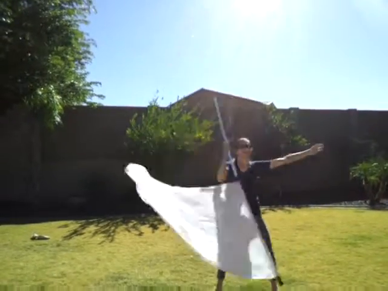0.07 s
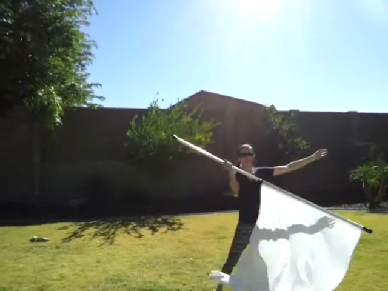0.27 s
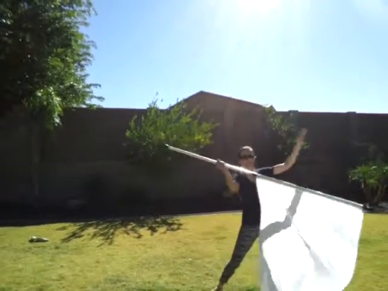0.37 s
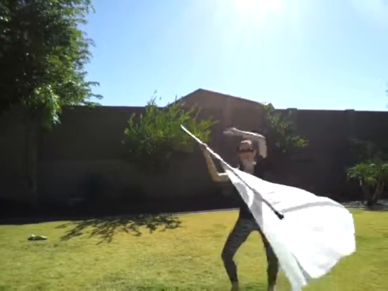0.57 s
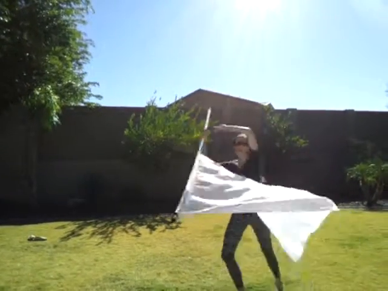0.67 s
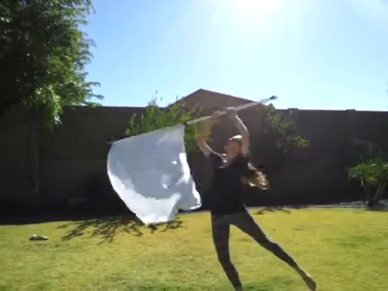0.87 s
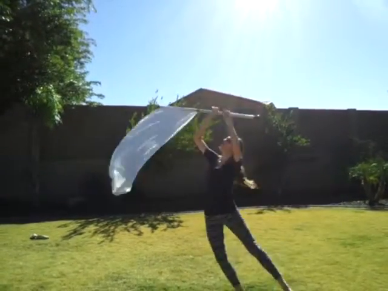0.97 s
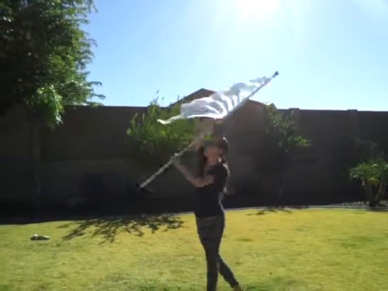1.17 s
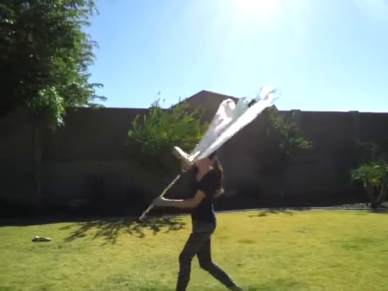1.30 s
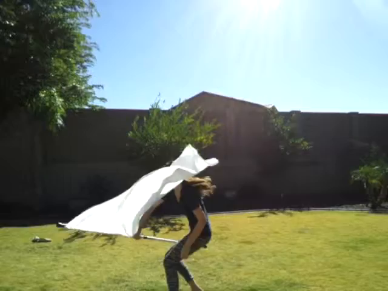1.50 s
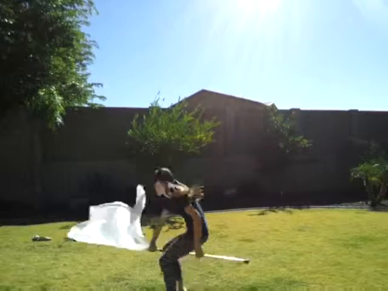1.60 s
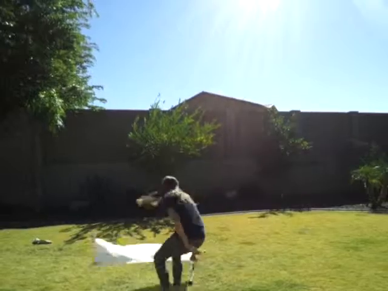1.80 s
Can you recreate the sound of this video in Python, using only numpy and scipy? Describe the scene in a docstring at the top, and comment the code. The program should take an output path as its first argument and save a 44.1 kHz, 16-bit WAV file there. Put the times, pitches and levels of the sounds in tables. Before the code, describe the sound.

A flag is spun close by in a quiet backyard. Cloth rustles softly, then from 0.2 to 0.35 seconds the hollow pole rattles in loud, bright clacks. Hands slap the pole near 0.5 and 0.85 seconds. The cloth snaps taut with a thump at about 0.95 seconds, then flutters with small flicks until light taps at 1.8 seconds. Garden walls add a light echo over faint outdoor rumble.

```python
"""A backyard lawn, where a flag is spun over a quiet bed of outdoor air. The cloth rustles and
flutters in tiny creases, flicks its folds open and snaps taut with a thump. Hands slap the hollow
pole at each catch, and it rattles in a quick run of bright clacks that ring the tube.
The garden walls throw back an echo of both pole and cloth."""
import sys
import numpy as np
from scipy import signal
from scipy.fft import rfft, irfft
from scipy.io import wavfile

SR = 44100
rng = np.random.default_rng(int(sys.argv[2]) if len(sys.argv) > 2 else 0)


def bounce(signal):
    """Save signal as a 16-bit WAV file at the path given by the first command-line argument."""
    frames = np.transpose(np.atleast_2d(signal))
    limited = np.clip(frames, -1, 1)
    pcm = np.round(limited * 32767).astype(np.int16)
    wavfile.write(sys.argv[1], SR, pcm)


N = 81585
TIME = np.arange(N) / SR

# tone of the outdoor bed: frequency_hz, gain_db
AIR_EQ = [(20, -4.5), (45, 7.5), (62, 13.5), (92, 11.5), (130, 6), (300, -4), (700, -5.5), (1400, -12),
          (2200, -9), (3300, -9), (4000, -12.5), (4400, 5), (4800, -6), (5400, -6.5), (6300, -11.5),
          (7500, -29)]
# tone of the echo off the walls: frequency_hz, gain_db
YARD_EQ = [(100, -17.5), (800, -13), (2000, 6), (3000, 3.5), (3700, 1.5), (4700, -5.5), (7000, -10)]
# fader curve of the running rustle: time_s, level_db
RUSTLE_CURVE = [(0, -46.5), (.06, -47.5), (.11, -48.5), (.16, -47), (.22, -44.5), (.33, -54), (.41, -63.5),
                (.52, -55.5), (.57, -52), (.65, -66.5), (.82, -57), (.9, -50.5), (1.04, -47), (1.13, -46.5),
                (1.22, -50), (1.42, -48.5), (1.6, -49.5), (1.73, -49.5), (1.81, -56.5)]
# swells of the cloth: start_s, flap_db, crinkle_db, length_s
FLUTTERS = [(0.053, -48.5, -47, 0.009), (0.072, -42.5, -46, .011), (0.222, -38, -43, 0.014),
            (.866, -50, -64, .04), (0.951, -42, -35.5, 0.0071), (1.015, -40.5, -41.5, .01),
            (1.048, -41, -40, .008), (1.054, -39, -31, 0.015), (1.075, -43, -45, 0.0084),
            (1.109, -46.5, -43.5, 0.0092), (1.175, -38, -41.5, 0.009), (1.188, -40, -42, 0.013),
            (1.26, -54, -47, 0.0084), (1.291, -42, -43, 0.0061), (1.333, -61, -44, 0.014),
            (1.36, -48, -43.5, 0.024), (1.476, -44, -39, .008), (1.564, -47, -45, 0.0038),
            (1.607, -45.5, -47.5, .018), (1.694, -41, -42, 0.02)]
# body of the flapping cloth: frequency_hz, gain_db
FLAP_EQ = [(30, -16), (120, -6), (310, 1.5), (480, -5.5), (750, -1.5), (1100, -4), (2000, -12),
           (4000, -34.5)]
# bright top of the creasing cloth: frequency_hz, gain_db
CRINKLE_EQ = [(200, -31), (700, -7), (1350, 1), (1900, -1), (2300, 0.5), (3500, -2.5), (4900, 0.5),
              (6000, -11), (7400, -29)]
# single folds flicking open, plus one low knock on the pole at 0.5445 s: start_s, level_db, pitch_hz
FOLD_FLICKS = [(.5445, -20, 900), (1.0158, -29, 4200), (1.0585, -24, 800), (1.1095, -31, 4500),
               (1.1778, -29, 1100), (1.3322, -29, 3500), (1.3565, -26, 1000), (1.3662, -28, 3200),
               (1.432, -32, 3300), (1.4745, -26, 4200), (1.5075, -27, 3200), (1.5857, -30, 3600),
               (1.6815, -27, 4300), (1.7253, -30, 4600)]
# the cloth snapping taut: start_s, level_db, push_s
THUMPS = [(0.0594, -33, 0.00022), (0.188, -32.5, 0.00063), (.5447, -23.5, .0006), (0.9499, -12.5, 0.00047),
          (1.0185, -32, 0.00015), (1.037, -30.5, .0006), (1.177, -24, .0005), (1.192, -33, 0.00047)]
# tone of the taut cloth: frequency_hz, gain_db
TAUT_EQ = [(30, -1), (100, -4), (220, -1.5), (330, 3.5), (480, -6.5), (620, -0.5), (760, 5), (1080, -11.5),
           (1350, -6), (1900, -23), (5000, -31.5)]
# hand slaps and light taps on the pole: start_s, level_db, pitch_hz, width_hz
HAND_TAPS = [(0.1297, -19.5, 2880, 4000), (0.1977, -21.5, 2900, 2000), (0.5411, -15.5, 2700, 2570),
             (0.8411, -20, 2560, 1950), (0.9116, -30, 2800, 2010), (.9241, -24, 4630, 1300),
             (0.936, -36, 4770, 1300), (0.9369, -20, 4380, 1600), (0.9718, -29, 4700, 1500),
             (0.9977, -45, 4770, 1300), (1.8255, -25, 4800, 1000), (1.8267, -23, 2900, 900)]
# fader curve of the chatter between clacks: time_s, level_db
RATTLE_CURVE = [(.19, -63.5), (.206, -33), (.22, -41.5), (.25, -33), (.3, -39), (.335, -41), (.37, -59.5),
                (.4, -71)]
# hard hits of the pole: start_s, level_db, pitch_hz, rebound_delay_s, rebound_gain_db, rebound_hz
CLACKS = [(0.208, 0, 4660, .0012, -9, 3590), (0.2312, -11, 4860, 0.0024, -2.5, 4120),
          (0.2513, -9, 4640, 0.00163, -6, 3840), (0.2752, -20, 4800, .002, -19, 4300),
          (.2795, 0.5, 4800, .00195, -3.5, 4660), (0.2995, -17, 4700, 0.0018, -1.5, 4700),
          (.345, -10.5, 4740, .0038, -2, 4320)]
# ringing modes of the tube: pitch_hz, level_db, t60_s
POLE_MODES = [(2750, -23.5, 0.02), (2950, -48, 0.031), (3780, -20, 0.026), (4280, -43.5, .025),
              (4734, -20, 0.058), (4900, -21, 0.044), (6250, -32, 0.051)]
# broad resonances of the tube wall: frequency_hz, gain_db
TUBE_EQ = [(1500, 1), (2300, 1.5), (3000, 3.5), (3350, -0.5), (3700, 2.5), (3950, -7.5), (4250, 0),
           (4430, -2.5), (4630, 2), (4860, -4), (5120, 2), (5600, -1.5), (6400, 3)]
# tone of the sharp sounds on their way to the microphone: frequency_hz, gain_db
PATH_EQ = [(60, -14), (500, -4.5), (2000, 2), (4000, 1), (5200, -1), (6000, -7), (7400, -11)]


def amp(db):
    """Decibels to gain."""
    return 10 ** (np.asarray(db) / 20)


def unit(x):
    """Scales to rms 1."""
    return x / np.sqrt(np.mean(x ** 2) + 1e-20)


def add(mix, start_s, sound):
    """Drops a sound into the mix at its cue."""
    part = mix[max(0, round(start_s * SR)):][:len(sound)]
    part += sound[:len(part)]


def eq(x, curve, size=4096):
    """Minimum-phase EQ that follows a curve of frequency_hz, gain_db."""
    hz, db = np.transpose(curve)
    bin_hz = abs(np.fft.fftfreq(size, 1 / SR))
    log_gain = np.log(amp(np.interp(np.log(bin_hz + 1), np.log(hz), db)))
    impulse = np.fft.ifft(np.exp(np.conj(signal.hilbert(log_gain)))).real
    return signal.fftconvolve(x, impulse[:size // 2])[:len(x)]


def ping(hz, width_hz):
    """A short, heavily damped ring whose envelope swells smoothly to 1."""
    t = TIME[:SR // 10]
    age = np.pi * width_hz * t
    return (age * np.exp(1 - age)) ** 2 * np.sin(2 * np.pi * hz * t)


def reflections(x, t60_s, build_s=0.001):
    """The wet signal only: dense reflections that build up and die away."""
    t = TIME[:int(t60_s * SR)]
    polarity = rng.choice([-1., 1.], N)[:len(t)]
    tail = polarity * amp(-60 * t / t60_s) * (1 - np.exp(-t / build_s))
    return signal.fftconvolve(x, tail / np.linalg.norm(tail))


def outdoor_air(level_db=-53.5):
    """A steady bed of far rumble and faint hiss."""
    return amp(level_db) * unit(eq(rng.standard_normal(N), AIR_EQ))


def yard_echo(flag, return_db=-13.5):
    """The garden walls throw the sound back as a bright, diffuse tail."""
    return amp(return_db) * eq(reflections(flag, t60_s=0.79, build_s=0.018)[:N], YARD_EQ)


def cloth_rustle(creases_per_s=2500, spread_db=2.5, wobble_db=3, wobble_s=0.0067, top_db=-4.3):
    """Many tiny creases give a low flapping and a bright crinkle, swelling at each flutter."""
    sizes = amp(spread_db * np.minimum(rng.exponential(1, N), 4))
    polarity = rng.choice([-1., 1.], N)
    creases = sizes * polarity * (rng.random(N) < creases_per_s / SR)
    wobble = np.interp(TIME / wobble_s, np.arange(N), rng.standard_normal(N))
    flap_power = amp(np.interp(TIME, *np.transpose(RUSTLE_CURVE)) + wobble_db * wobble) ** 2
    crinkle_power = flap_power * amp(top_db) ** 2
    for start_s, flap_db, crinkle_db, length_s in FLUTTERS:
        progress = np.clip((TIME - start_s) / length_s, 0, 1)
        swell = 2 * np.sin(np.pi * progress ** 0.64) ** 2  # quick attack, slower release
        flap_power += amp(flap_db) ** 2 * swell
        crinkle_power += amp(crinkle_db) ** 2 * swell
    flap = unit(eq(creases, FLAP_EQ)) * np.sqrt(flap_power)
    crinkle = unit(eq(creases, CRINKLE_EQ)) * np.sqrt(crinkle_power)
    return flap + crinkle


def fold_flicks(crackle_db=-3):
    """A fold opens, or the pole gets one low knock, with one sharp tick and a brief crackle."""
    out = np.zeros(N)
    for start_s, db, hz in FOLD_FLICKS:
        tick = amp(db) * ping(hz, width_hz=0.55 * hz)
        add(out, start_s, tick)
        add(out, start_s, amp(crackle_db) * reflections(tick, t60_s=0.02))
    return out


def cloth_thumps():
    """Snapping taut, the cloth pushes out one pressure swing, coloured by the sheet."""
    out, t = np.zeros(N), TIME[:SR // 10]
    for start_s, db, push_s in THUMPS:
        swing = (1 - t / push_s) * np.exp(-t / push_s)
        thump = eq(swing, TAUT_EQ)
        add(out, start_s, amp(db) * thump / abs(thump).max())
    return out


def hand_taps(scatter_db=-5.5):
    """Damped slaps and taps on the held pole, each with a brief scatter."""
    out = np.zeros(N)
    for start_s, db, hz, width_hz in HAND_TAPS:
        tap = amp(db) * ping(hz, width_hz)
        add(out, start_s, tap)
        add(out, start_s, amp(scatter_db) * reflections(tap, t60_s=0.033))
    return out


def bending_chirp(hits, travel_s=0.0028):
    """Low bending waves travel slower along the tube, so each hit chirps downwards."""
    hz = np.clip(np.fft.rfftfreq(2 * N, 1 / SR), 2300, 5200)
    lag_s = travel_s * (np.sqrt(hz[-1] / hz) - 1)  # behind the fastest wave
    phase = np.pi * np.cumsum(lag_s) * SR / N
    return irfft(rfft(hits, 2 * N) * np.exp(-1j * phase))[:N]


def pole_rattle(contacts_per_s=1000):
    """Small random contacts chatter between the hard clacks."""
    ticks = rng.standard_normal(N) * (rng.random(N) < contacts_per_s / SR)
    chatter = unit(signal.fftconvolve(ticks, ping(hz=4420, width_hz=1640))[:N])
    fader_db = np.interp(TIME, *np.transpose(RATTLE_CURVE), left=-np.inf, right=-np.inf)
    return chatter * amp(fader_db)


def pole_clacks(width_hz=990, ring_attack_s=0.0004, scatter_db=-7.5):
    """Each clack is a hard contact and its rebound; the contact rings the tube."""
    out, t = np.zeros(N), TIME[:SR // 10]
    ring = sum(amp(db - 60 * t / t60_s) * np.sin(2 * np.pi * hz * t) for hz, db, t60_s in POLE_MODES)
    ring *= (1 - np.exp(-t / ring_attack_s)) ** 2
    for start_s, db, hz, rebound_delay_s, rebound_gain_db, rebound_hz in CLACKS:
        contact = ping(hz, width_hz)
        add(out, start_s, amp(db) * (contact + ring))
        add(out, start_s + rebound_delay_s, amp(db + rebound_gain_db) * ping(rebound_hz, width_hz))
        add(out, start_s, amp(db + scatter_db) * reflections(contact, t60_s=0.035, build_s=0.0008))
    return out


def scene():
    """The mono mix: pole and cloth up front, the echo of the walls and the air behind."""
    tube = eq(pole_clacks() + pole_rattle(), TUBE_EQ)
    pole = bending_chirp(tube + hand_taps())
    transients = eq(pole + fold_flicks(), PATH_EQ)
    flag = transients + cloth_thumps() + cloth_rustle()
    return (flag + yard_echo(flag) + outdoor_air())[None]


def record(dry, mic_cutoff_hz=7620, ceiling=0.93, final_cutoff_hz=16450):
    """A narrow-band microphone soft-clips the loudest peaks; a last low-pass trims the top."""
    mic_filter = signal.firwin(301, mic_cutoff_hz, window=("kaiser", 9), fs=SR)
    final_filter = signal.firwin(511, final_cutoff_hz, window=("kaiser", 9), fs=SR)
    narrow = signal.oaconvolve(dry, mic_filter[None], "same")
    rounded = narrow / (1 + (narrow / ceiling) ** 4) ** (1 / 4)
    return signal.oaconvolve(rounded, final_filter[None], "same")


dry = scene()
out = record(dry)
bounce(out)
```